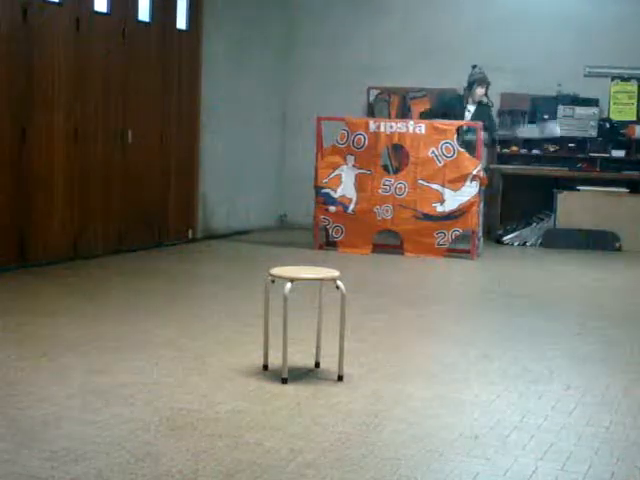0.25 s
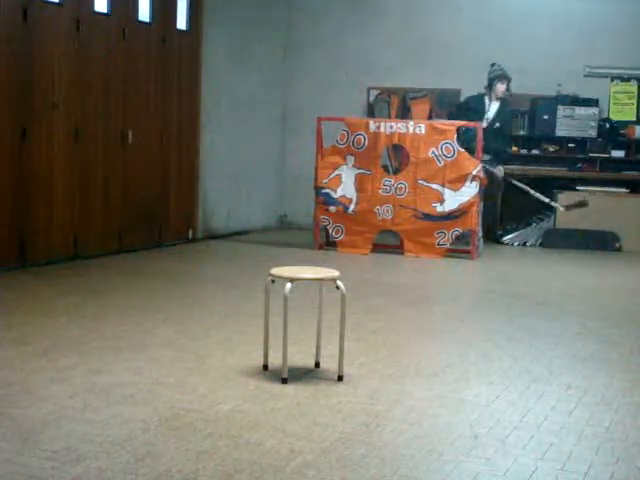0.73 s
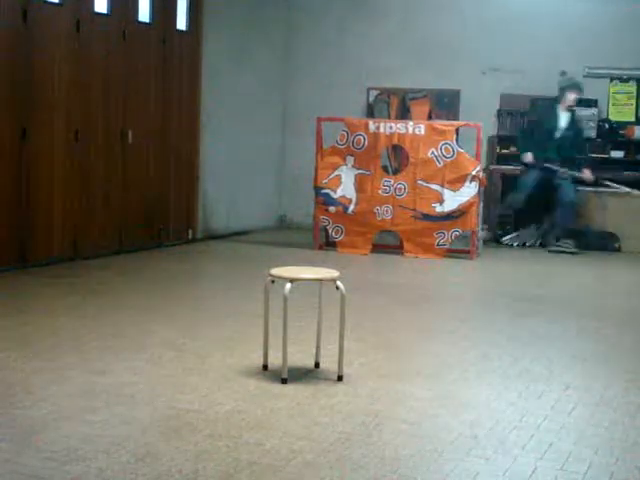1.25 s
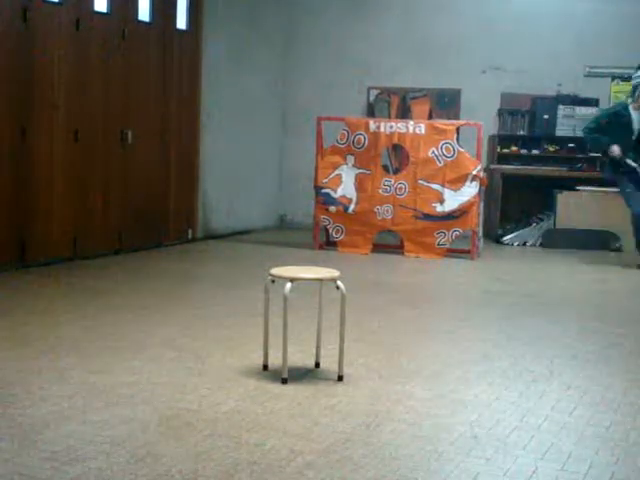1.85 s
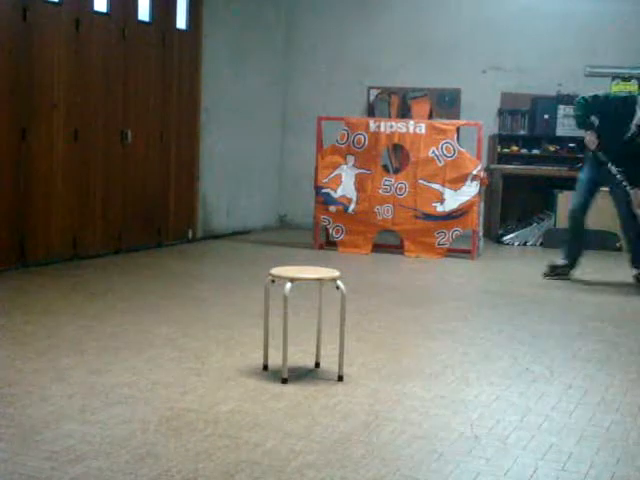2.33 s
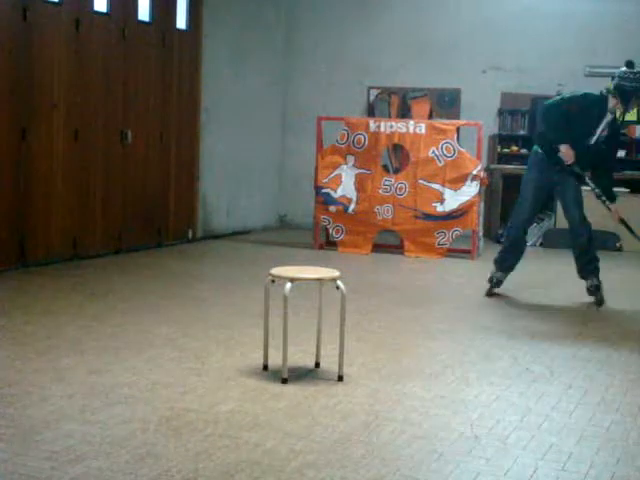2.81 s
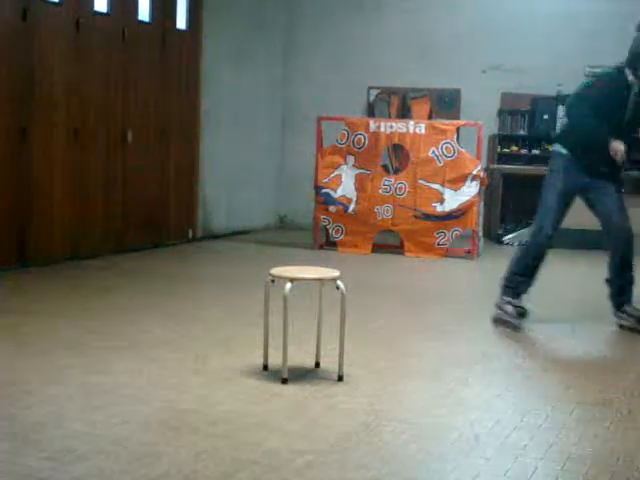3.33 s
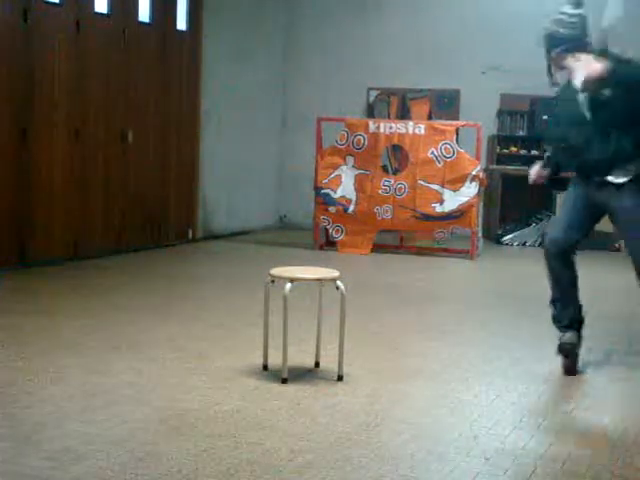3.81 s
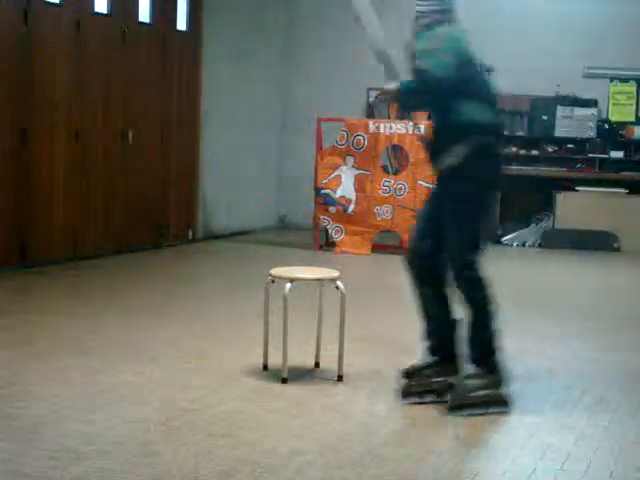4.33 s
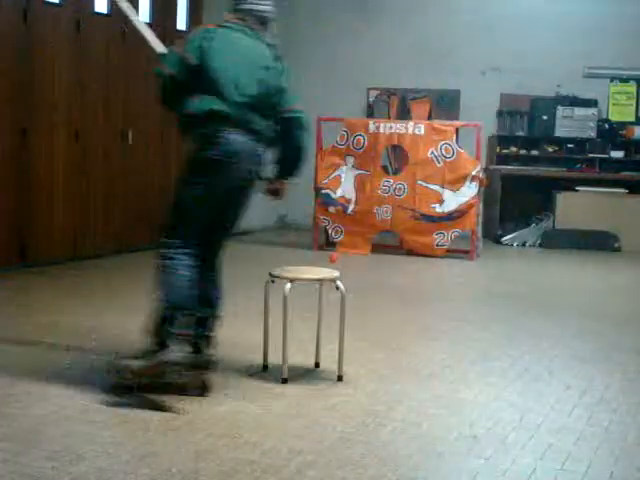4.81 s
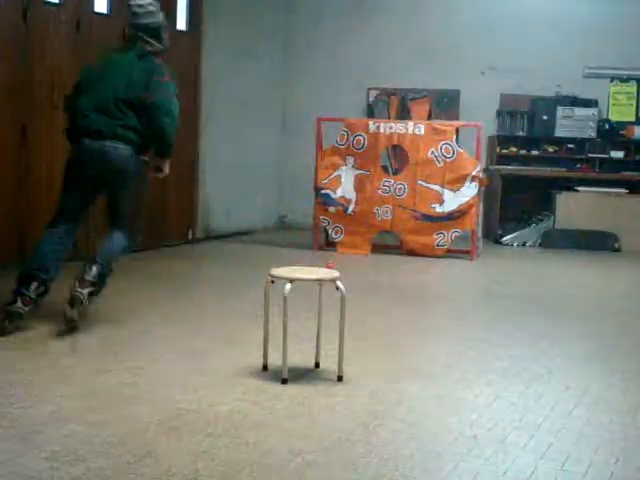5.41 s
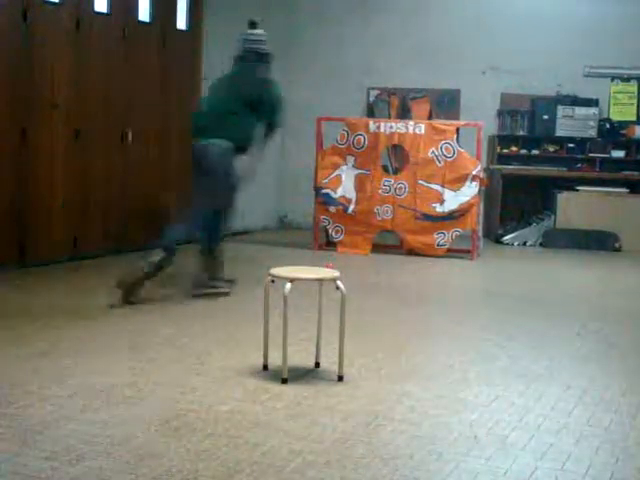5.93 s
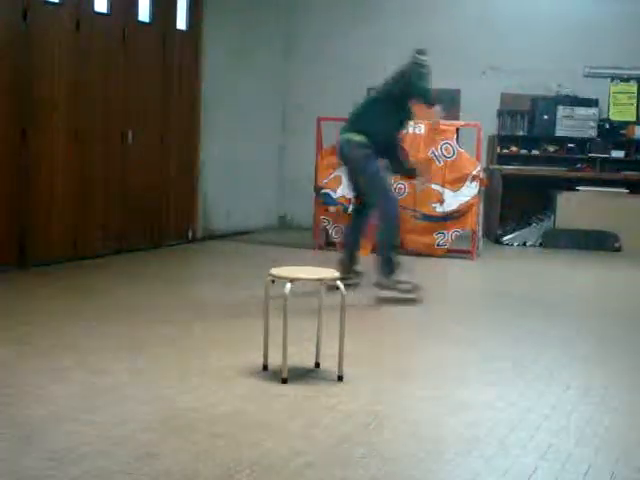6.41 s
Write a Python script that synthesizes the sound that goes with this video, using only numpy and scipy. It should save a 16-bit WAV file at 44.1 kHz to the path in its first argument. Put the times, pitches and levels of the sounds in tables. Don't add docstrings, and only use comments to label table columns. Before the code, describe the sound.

In a bare tiled garage with hard, ringing walls, faint air noise and hiss lie under low wheel rumble. A very soft tap at 0.2 s leads to a tight, hollow rattle of stick on plastic ball near 0.6 s. Dull skate bumps and light rolling follow. At 2.25 s a loud bright double crack rings out, then more sharp clacks at 2.7-3.2 s, their echoes overlapping. A weaker tap comes at 3.85 s. From 4 to 5 s it is mostly quiet rolling, scuffing and faint skate touches. Around 5.3-5.7 s rubber wheels squeal softly, jumping higher into a brief rough skid, with a modest knock at its end and another at 5.8 s. Skates thump at 6 s, the blade double-clacks on the tube goal frame at 6.35 s, and a loud bright clack at 6.6 s ends it. The small microphone is thin and slightly squashed.

```python
import sys
import numpy as np
from scipy import signal
from scipy.fft import rfft, irfft
from scipy.io import wavfile
from scipy.ndimage import uniform_filter1d

SR = 44100
rng = np.random.default_rng(int(sys.argv[2]) if len(sys.argv) > 2 else 0)


def wrap_up_sound(samples):
    columns = np.atleast_2d(samples).T
    tamed = np.clip(columns, -1, 1)
    steps = np.round(tamed * 32767).astype(np.int16)
    wavfile.write(sys.argv[1], SR, steps)


def ratio_of_db(decibels):
    return 10 ** (np.asarray(decibels, float) / 20)


N = 293706

# [t/s, clack/dB, weight/dB, hardness/dB]
STICK_KNOCKS = [(0.1747, -39, 4.5, 2), (0.5555, -22, 2, -8.5), (0.5615, -19, -5.5, -10.5),
                (0.5671, -13.5, 5.5, -10.5), (0.5784, -19, 0, -9.5), (2.2505, -13, -17, -4),
                (2.2559, -8, -20, -2), (2.3087, -16, 0, -11), (2.7282, -10.5, -16.5, -5),
                (2.7444, -7, -14.5, -6.5), (2.8264, -19.5, -20, -7), (2.8914, -22, -16.5, -10),
                (2.9648, -25.5, 0.5, -1), (3.1433, -10, -13.5, -15), (3.2131, -12.5, -3.5, -4.5),
                (3.8525, -26.5, 0.5, -6.5), (3.8561, -20.5, 0, -3), (5.6664, -23.5, -2.5, -4.5),
                (5.8004, -28.5, -6, -17), (6.6233, -7, -20.5, -10), (6.6374, -15, -12.5, -8)]
# [t/s, clack/dB, weight/dB, hardness/dB]
SKATE_KNOCKS = [(0.0639, -42.5, 11.5, 4), (1.0528, -39.5, -1.5, -7), (1.2705, -27, 4.5, -12),
                (1.7336, -26, -0.5, -6), (2.063, -26.5, 7.5, -14.5), (2.4694, -24, -0.5, -5.5),
                (3.5504, -28.5, 0.5, -2.5), (3.5798, -31.5, 9.5, -16.5), (3.7764, -36.5, -8.5, -2.5),
                (4.158, -37, -5, -0.5), (4.2994, -45, 3.5, 0.5), (4.7574, -40.5, 7, -0.5),
                (4.7681, -66, 5, -4.5), (5.1796, -35.5, 0, -14), (5.9883, -34.5, 10.5, -1.5),
                (6.0094, -36, 4.5, -8)]
# [hollow/dB, hollow per weight/(dB/dB), crack/dB, crack per hardness/(dB/dB)]
STICK_LAW = (5.5, 0.64, -8, 1.41)
# [hollow/dB, hollow per weight/(dB/dB), crack/dB, crack per hardness/(dB/dB)]
SKATE_LAW = (1.5, 0.55, -1, 1.16)
# [t/s, f/Hz, level/dB]
BALL_RINGS = [(0.175, 2430, -22.5), (0.579, 1080, -9.5), (0.579, 595, -10.5), (0.579, 2220, -10.5),
              (0.617, 1060, -14), (0.658, 155, -15), (2.256, 2330, -4), (2.256, 3800, -7.5),
              (2.7285, 3550, -2), (2.733, 1290, -4.5), (2.965, 5760, -22), (3.144, 2530, -5),
              (3.144, 3240, -13.5), (3.172, 7870, -26.5), (3.2145, 4260, -17), (3.214, 940, -0.5),
              (4.768, 2230, -30), (4.768, 6240, -41), (5.18, 169, -30), (5.667, 950, -17),
              (5.667, 150, -21.5), (5.667, 260, -20.5), (3.79, 4940, -35), (5.801, 2080, -19.5),
              (5.801, 1060, -23.5), (6.01, 285, -18.5), (6.624, 2050, -7), (6.624, 3100, -3)]
# [f/Hz, level/dB]
FRAME_RINGS = [(800, -12), (2380, -17), (3470, -15.5), (4580, -16)]
# [t/s, level/dB]
TICK_TIMES = [(0.0639, -48), (2.2559, -26.5), (2.965, -37), (3.2145, -25), (4.7684, -49.5), (5.667, -35)]
# [f/Hz, level/dB]
TICK_COLOUR = [(1500, -31.5), (3500, -2.5), (5000, -4.5), (8000, -3), (12000, -13)]
# [t/s, blow/dB]
FRAME_BLOWS = [
    (6.3447, -17),
    (6.352, -12.5),
]
# [f/Hz, level/dB]
FRAME_COLOUR = [(130, -15), (420, -7), (1040, 1.5), (1740, -8.5), (2360, -6), (2880, -18), (3460, -4.5),
                (4080, -15), (4660, -7.5), (5380, -17), (7100, -15.5), (10300, -25)]
# [t/s, rolling/dB, edging/dB]
WHEEL_MOVES = [(0.0, -36, -7), (0.17, -43.5, -1), (0.3, -55.5, -4), (0.55, -59, -3.5), (0.87, -48, -1),
               (1.11, -58.5, 3), (1.7, -46, -7.5), (2.1, -52.5, 2), (2.45, -42, -5), (3.0, -49.5, -3.5),
               (3.6, -47.5, -10), (4.08, -41, -6.5), (4.41, -47, -5.5), (5.01, -53, -5), (5.25, -48.5, 3),
               (5.6, -47.5, 0.5), (5.94, -50.5, 10.5), (6.3, -52.5, -12)]
# [f/Hz, level/dB per Hz]
ROLL_COLOUR = [(35, -50), (60, -37), (286, -6.5), (442, -20), (533, -1.5), (1400, -12.5), (2210, -13),
               (2500, -61), (3250, -27), (5500, -120)]
# [t/s, level/dB, squeal f/Hz]
SKID_PATH = [
    (5.15, -69.5, 2925),
    (5.3, -53.5, 2900),
    (5.44, -49, 2950),
    (5.499, -55, 3083),
    (5.56, -52, 3867),
    (5.635, -37, 3930),
    (5.7, -54, 4190),
    (5.75, -67, 3900),
]
# [f/Hz, time to fall 60 dB/s]
HALL_DECAY = [(200, 0.51), (500, 0.58), (1100, 0.75), (2300, 0.79), (4500, 0.69), (8000, 0.57)]
# [f/Hz, level/dB per Hz]
AIR_COLOUR = [(15, -44), (25, -15), (92, 11.5), (339, -1), (447, 11), (574, 10), (1730, -23), (2580, -1),
              (7990, -29), (10000, -27), (13000, -66), (22000, -120)]
# [f/Hz, level/dB per Hz]
HISS_COLOUR = [(20, -4), (60, -4.5), (200, 11), (2000, 1), (6000, -6.5), (10400, -7)]
# [f/Hz, level under the peak/dB]
MISSING_UNDER_PEAK = [(900, -40), (1600, -24.5), (3000, -25.5), (5000, -5.5), (8000, -13.5), (10000, 0.5)]


def level(x, db):
    return x * ratio_of_db(db) / np.sqrt(np.mean(x ** 2))


def noise():
    return rng.standard_normal(N)


def band(x, lo_hz, hi_hz, order=2):
    sos = signal.butter(order, [lo_hz, min(hi_hz, .45 * SR)], "band", fs=SR, output="sos")
    return signal.sosfilt(sos, x)


def curve(f, points):
    hz, db = np.transpose(points)
    return ratio_of_db(np.interp(np.log(f), np.log(hz), db))


def coloured(x, points):
    f = np.fft.rfftfreq(len(x), 1 / SR) + 1
    return level(irfft(rfft(x) * curve(f, points), len(x)), 0)


def walk(rate):
    hold = int(SR / rate)
    steps = np.repeat(rng.standard_normal(N // hold + 1), hold)
    return uniform_filter1d(uniform_filter1d(steps, hold), hold)[:N]


def over_time(s, values):
    return np.interp(np.arange(N) / SR, s, values)


def add(out, s, sound):
    start = int(s * SR)
    out[start:start + len(sound)] += sound


def click(points, size=1024):
    f = np.fft.rfftfreq(size, 1 / SR) + 1
    cepstrum = irfft(np.log(curve(f, points)), size)
    fold = 1 + np.sign(size / 2 - np.arange(size))
    fold[0] = 1
    return irfft(np.exp(rfft(cepstrum * fold)), size)


def hall(wet_db, build_s, direct_db=0., size=SR):
    t = np.arange(size) / SR
    density = np.clip(.14 + (t / .07) ** 2, 0, .4)
    echoes = rng.standard_normal(size) * (rng.random(size) < density) / density ** 0.42
    echoes *= 1 - np.exp(-t / max(build_s, 1e-4))
    f = np.log(np.fft.rfftfreq(size, 1 / SR) + 1)
    favour_db = 2.3 * np.sqrt(150) * uniform_filter1d(rng.standard_normal(len(f)), size=150)
    spectrum = rfft(echoes) * ratio_of_db(favour_db)
    hz, t60 = np.transpose(HALL_DECAY)
    tail = np.zeros(size)
    for k in range(len(hz)):
        share = np.interp(f, np.log(hz), np.arange(len(hz)) == k)
        tail += irfft(spectrum * share, size) * np.exp(-np.log(1000) * t / t60[k])
    tail *= ratio_of_db(wet_db)
    bright = ratio_of_db(direct_db) * np.diff(np.exp(-np.arange(40) / 8.3), prepend=0)
    bounce = int(.0022 * SR)
    tail[:40] += bright
    tail[bounce:bounce + 40] += 0.34 * bright
    return tail


def in_hall(events, wet_db, build_s, direct_db):
    out = np.zeros(N + 2 * SR)
    for s, sound in events:
        add(out, s, signal.fftconvolve(sound, hall(wet_db, build_s, direct_db)))
    return out[:N]


def knocks(table, law, boom_db, gain_db, wet_db, build_s, direct_db):
    hollow_db, hollow_per_weight, crack_db, crack_per_hardness = law
    events = []
    for s, clack, thud, bite in table:
        hollow = hollow_db + hollow_per_weight * thud
        crack = crack_db + crack_per_hardness * bite
        low = [(70, 1.34 * thud + boom_db - 9.0), (190, 1.47 * thud + boom_db), (430, thud), (1000, hollow)]
        high = [(2050, 0.024), (3800, bite), (6300, crack), (9600, crack - 9), (16000, crack - 25)]
        events.append((s, ratio_of_db(clack + gain_db) * click(low + high)))
    return in_hall(events, wet_db, build_s, direct_db)


def stick():
    return knocks(STICK_KNOCKS, STICK_LAW, boom_db=-15, gain_db=26.5,
                  wet_db=-25.0, build_s=0.0014, direct_db=-7.5)


def rings():
    notes = [(s, hz, 41 + 0.19 * hz, db) for s, hz, db in BALL_RINGS]
    notes += [(6.352, hz, 170, db) for hz, db in FRAME_RINGS]
    events = []
    for s, hz, width_hz, db in notes:
        peak = [(hz / 3, -42), (hz - width_hz, -14), (hz - width_hz / 3, -2)]
        peak += [(hz + width_hz / 3, -2), (hz + width_hz, -14), (hz * 2.2, -42)]
        events.append((s, ratio_of_db(db + 25.0) * click(peak)))
    return in_hall(events, wet_db=-28.5, build_s=0.0009, direct_db=0.)


def ticks():
    events = [(s, ratio_of_db(db + 27) * click(TICK_COLOUR)) for s, db in TICK_TIMES]
    return in_hall(events, wet_db=-26, build_s=0.002, direct_db=0.)


def goal_frame():
    events = [(s, ratio_of_db(db + 27.5) * click(FRAME_COLOUR)) for s, db in FRAME_BLOWS]
    return in_hall(events, wet_db=-25.0, build_s=0.0038, direct_db=-8.5)


def skates():
    return knocks(SKATE_KNOCKS, SKATE_LAW, boom_db=-5.0, gain_db=25,
                  wet_db=-24.5, build_s=0.0049, direct_db=-7.0)


def wheels():
    s, roll_db, edging_db = np.transpose(WHEEL_MOVES)
    roll_db, edging_db = over_time(s, roll_db), over_time(s, edging_db)
    scuff_db = roll_db + edging_db
    grit_db = roll_db - 2.5 + 0.81 * edging_db
    joints = 1 + 2.6 * (rng.random(N) < 60 / SR) * rng.exponential(size=N)
    roll = coloured(noise() * uniform_filter1d(joints, size=60), ROLL_COLOUR)
    rub = noise()
    scuff = band(rub, 1350, 4400) + .5 * band(rub, 2280, 2450) + .4 * band(rub, 3200, 3500)
    grains = noise() * ratio_of_db(3.8 * np.minimum(rng.exponential(size=N), 6.5))
    grit = band(grains, 4250, 9800)
    near = level(roll, -4.5) * ratio_of_db(roll_db + 0.4 * walk(3.4))
    near += level(scuff, -7.0) * ratio_of_db(scuff_db + 6.6 * walk(25))
    near += level(grit, -7) * ratio_of_db(grit_db + 2.7 * walk(14))
    room = hall(-29, 0.026)
    return signal.fftconvolve(near, room / np.linalg.norm(room))[:N]


def skid():
    s, db, hz = np.transpose(SKID_PATH)
    db, hz = over_time(s, db), over_time(s, hz)
    phase = 2 * np.pi * np.cumsum(hz * (1 + .03 * walk(12))) / SR
    hard = np.clip((hz - 3200) / 600, 0, 1)
    slips = rng.standard_normal((2, N)) * ratio_of_db(2.0 * rng.exponential(size=N))
    narrow = level(band(slips[0], 5, 170, order=1), 0)
    wide = level(band(slips[0], 5, 700, order=2), 0)
    upper = ((1 - hard) * narrow + hard * wide) * np.sin(phase)
    lower = (1 - hard) * level(band(slips[1], 5.7, 60, order=1), -1.0) * np.sin(phase / 2)
    return (upper + lower) * ratio_of_db(db + 2.0 * walk(11))


def still_air():
    return level(coloured(noise(), AIR_COLOUR), -60.5) * ratio_of_db(1.4 * walk(5))


def scene():
    struck = stick() + rings() + ticks() + goal_frame()
    skater = skates() + wheels() + skid()
    return (struck + skater + still_air())[None]


def duck(x):
    slow = 1 / (0.4 * SR)
    power = signal.lfilter([slow], [1, slow - 1], x ** 2)
    return ratio_of_db(-9 * power / (power + ratio_of_db(2 * -29)))


def starve(x, count=8):
    block_s, start_s = 0.036, 0.0255
    f, t, cells = signal.stft(x, SR, nperseg=384, noverlap=192)
    power = np.abs(cells) ** 2
    block = (t - start_s) // block_s
    broad = uniform_filter1d(power, size=13, axis=0)
    later = [np.roll(broad, -k, axis=1) * (np.roll(block, -k - 1) == block) for k in range(count)]
    coming = np.max(later, axis=0)
    hz, db = np.transpose(MISSING_UNDER_PEAK)
    limit = coming * ratio_of_db(2 * np.interp(f, hz, db))[:, None]
    kept = uniform_filter1d(power, size=3, axis=0) > limit
    return signal.istft(cells * kept, SR, nperseg=384, noverlap=192)[1][:N]


def band_limit(x):
    return signal.sosfilt(signal.butter(12, 10160, fs=SR, output="sos"), x)


def record(dry):
    thin = signal.sosfilt(signal.butter(3, 170, "high", fs=SR, output="sos"), dry)
    rounded = np.tanh(1.178 * thin) / 1.018
    hiss = duck(thin) * level(coloured(noise(), HISS_COLOUR), -57.5)
    mix = starve((rounded + hiss)[0])[None]
    return band_limit(mix)


dry = scene()
out = record(dry)
wrap_up_sound(out)
```